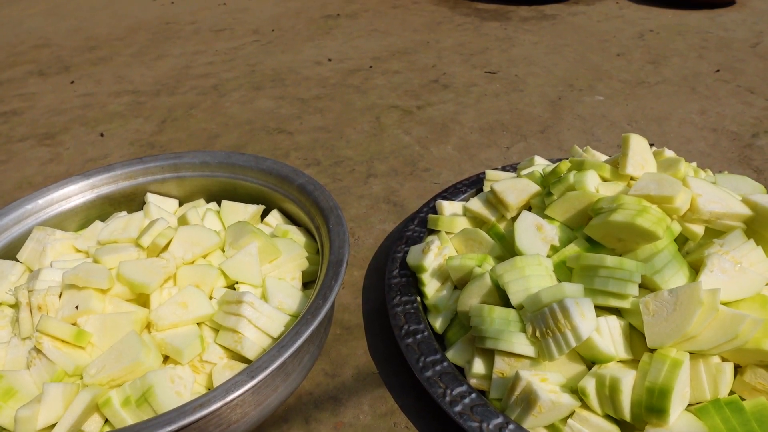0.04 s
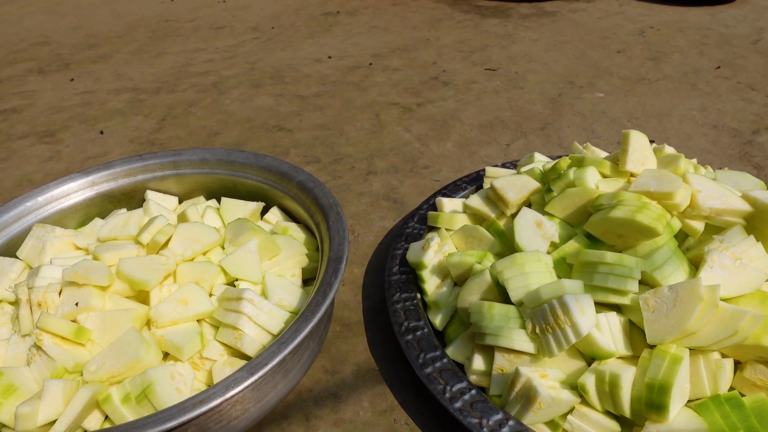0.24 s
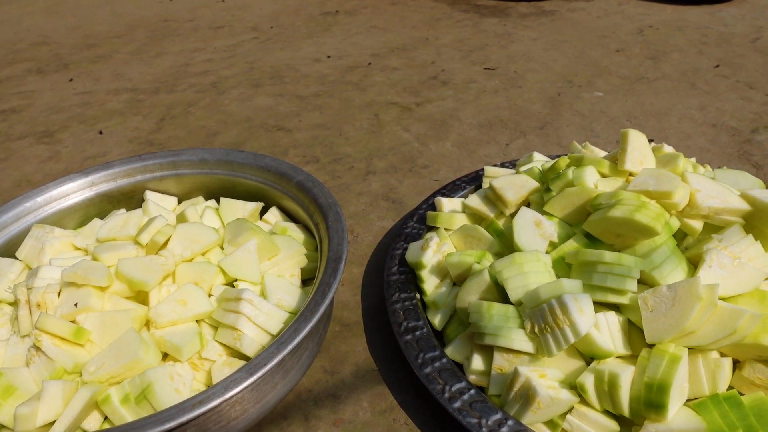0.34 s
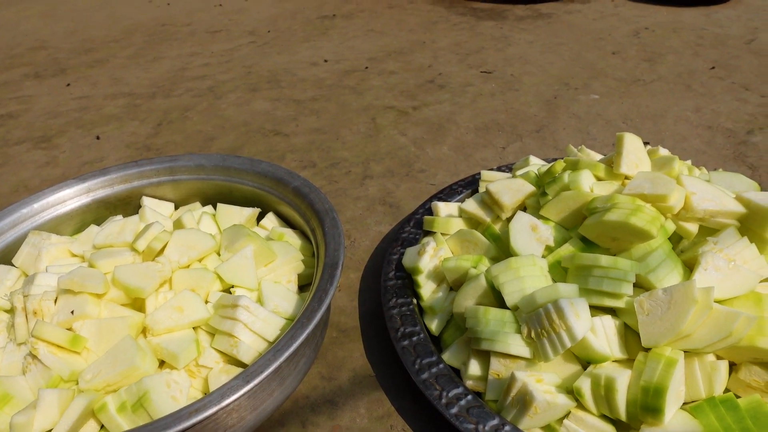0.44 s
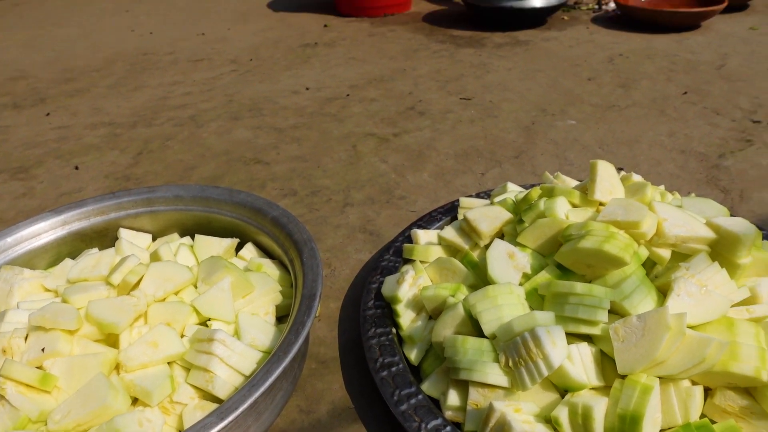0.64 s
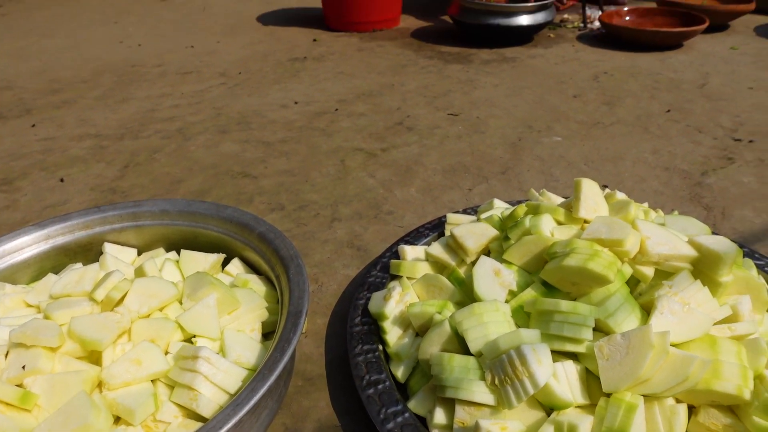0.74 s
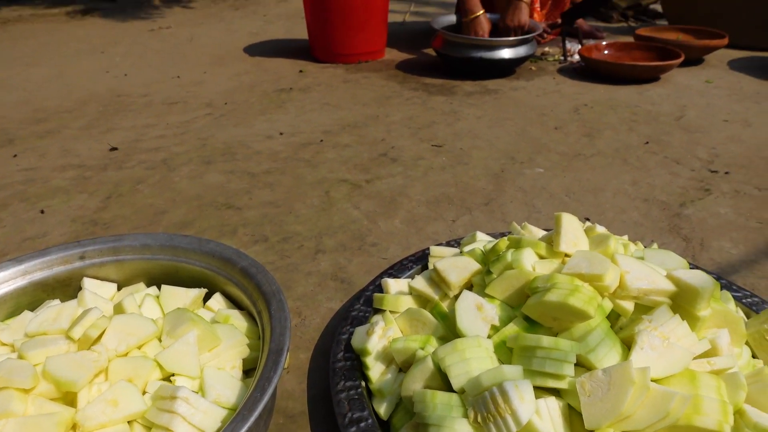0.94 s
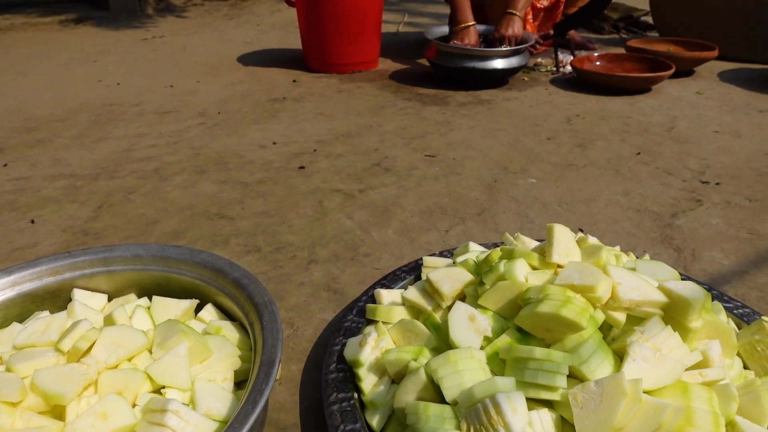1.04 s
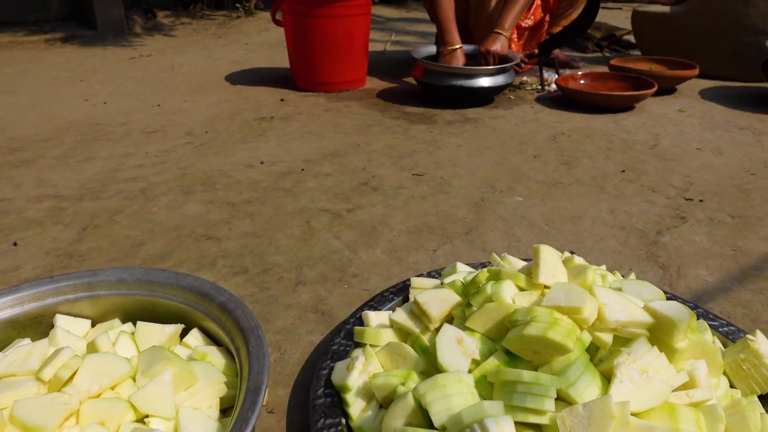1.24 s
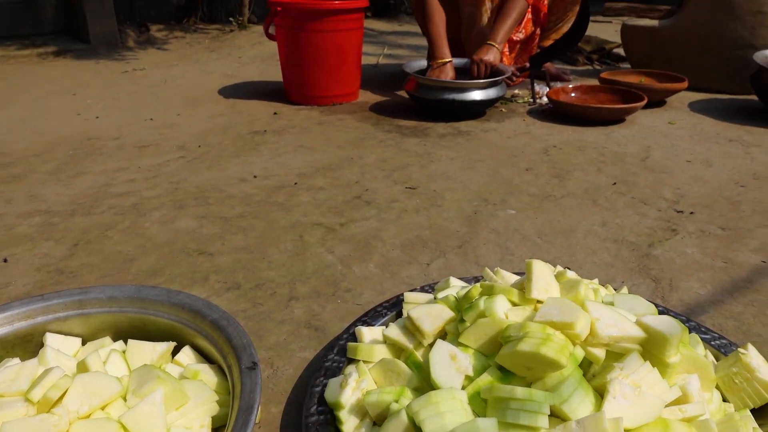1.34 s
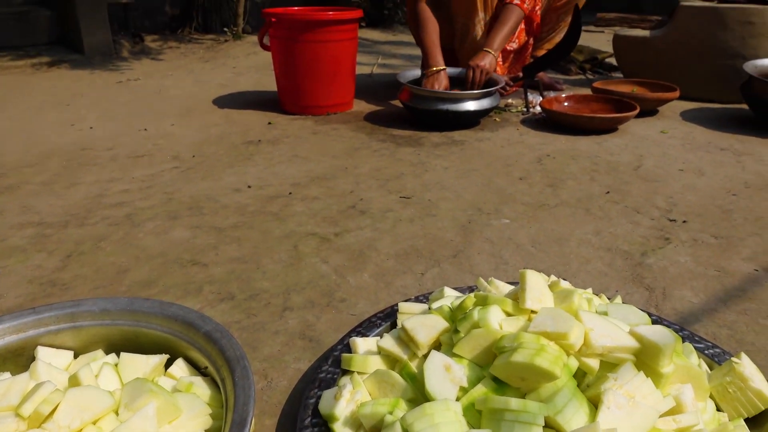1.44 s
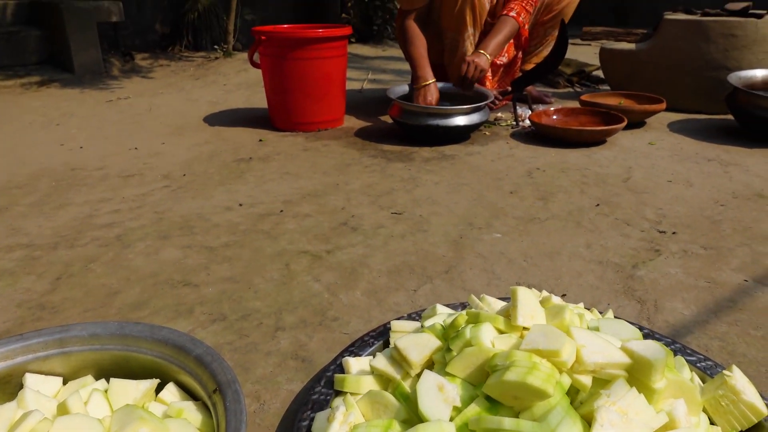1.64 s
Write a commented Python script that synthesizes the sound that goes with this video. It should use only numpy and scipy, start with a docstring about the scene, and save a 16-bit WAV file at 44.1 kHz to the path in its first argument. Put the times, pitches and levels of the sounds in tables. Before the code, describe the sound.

Water splashes as hands wash something in a metal pot, in an open yard outdoors

```python
"""Short slaps and splashes: hands wash something in a metal pot of water, a few metres away in an open yard.
Bursts of grains make the splashes, climbing sines the single clear rings (mostly trapped air bubbles)
and a crowd of resonators the slosh; narrow resonances add the pot. One flung drop ticks on the left
as a set of dying sines.
Behind lie a low outdoor rumble and a soft hiss of coloured noise and, briefly, a faint thin sine tone."""
import sys
import numpy as np
from scipy import signal
from scipy.fft import rfft, irfft
from scipy.io import wavfile
from scipy.ndimage import map_coordinates

SR = 44100
rng = np.random.default_rng(int(sys.argv[2]) if len(sys.argv) > 2 else 0)


def materialize(psi):
    """Save the field psi as 16-bit PCM at rate SR to the path in sys.argv[1].

    A 1-D psi becomes a single channel; in a 2-D psi each row is a channel.
    """
    bounded = np.clip(np.atleast_2d(psi).T, -1, 1)
    quanta = np.round(bounded * 32767).astype(np.int16)
    wavfile.write(sys.argv[1], SR, quanta)


N = 74970
TIME, FREQS = np.arange(N) / SR, np.fft.rfftfreq(N, 1 / SR)
SHORT = TIME[:SR // 8]   # time axis of one brief event, s
GRAINS_PER_S, GRAIN_SPREAD_DB = 20000, 4   # density and unevenness of the water's clicks

# How strongly the stirred water sloshes, before the pot colours it.
# Each row: time in seconds, level in dB.
SLOSH_LEVEL = [(.243, -61), (.25, -36.5), (.306, -37.5), (.333, -34.5), (.365, -43), (.405, -44),
               (.43, -53), (.465, -50), (.51, -58.5), (.558, -48), (.59, -56.5), (.69, -59), (.725, -50),
               (.77, -58.5), (.815, -49), (.88, -56.5), (1.04, -51), (1.12, -42), (1.17, -46), (1.23, -45),
               (1.252, -50.5), (1.275, -43.5), (1.30, -48.5), (1.345, -44.5), (1.40, -54.5), (1.44, -47.5),
               (1.5, -52)]


def from_db(db):
    """Decibels to gain."""
    return 10 ** (np.asarray(db) / 20)


def rms_one(x):
    """Scale to unit rms."""
    return x / np.sqrt(np.mean(x * x))


def dying(t, t60):
    """Exponential decay that falls 60 dB in t60 seconds."""
    return np.exp(-np.log(1000) * t / t60)


def in_time(rows):
    """Draw each column of a table as a curve, sample by sample."""
    s, *columns = np.transpose(rows)
    return [np.interp(TIME, s, c) for c in columns]


def over_hz(points):
    """Read a table on a log-frequency axis."""
    hz, value = np.transpose(points)
    return np.interp(np.log1p(FREQS), np.log(hz), value)


def band(x, low_hz, high_hz, order=2):
    """Butterworth band-pass, its upper edge kept below the top of the range."""
    high = min(high_hz, .47 * SR)
    return signal.sosfilt(signal.butter(order, [low_hz, high], "band", fs=SR, output="sos"), x)


def resonate(x, hz, width_hz):
    """One resonance with unit gain on top."""
    return signal.lfilter(*signal.iirpeak(hz, hz / width_hz, fs=SR), x + 1e-18)


def colour(x, spectrum):
    """Filter a steady sound by a spectrum table; unit rms."""
    return rms_one(irfft(rfft(x) * from_db(over_hz(spectrum)), N))


def grains(count):
    """Dense random clicks of uneven size and either sign: bursting droplets."""
    size_db = GRAIN_SPREAD_DB * np.minimum(rng.exponential(size=count), 4)
    sizes = from_db(size_db) * np.sign(rng.normal(size=count))
    return sizes * (rng.random(count) < GRAINS_PER_S / SR)


def at(s, x):
    """Place a short sound in time."""
    return np.pad(x, (int(s * SR), N))[:N]


def panned(x, db):
    """Place a sound between the ears; positive dB leans left."""
    return from_db([[db / 2], [-db / 2]]) * x


def splash(s, db, hold, hz, body_db, spray_db):
    """A first crack, then a burst of droplets: a main resonance, a lower body and fine spray."""
    t60_s, width = .024, .22   # width as a share of the centre pitch
    crack_db, crack_t60_s = 0, .006   # extra strength of the first contact
    body_hz, spray_hz = (1010, 3100), (5400, 10670)
    mist_db = -21   # finest spray, up to the top of the treble
    fall = dying(np.maximum(SHORT - hold, 0), t60_s)
    shape = fall + from_db(crack_db) * dying(SHORT, crack_t60_s)
    core, body, spray = (shape * grains(len(SHORT)) for part in range(3))
    burst = (rms_one(band(core, hz / (1 + width), hz * (1 + width)))
             + from_db(body_db) * rms_one(band(body, *body_hz, order=3))
             + from_db(spray_db) * rms_one(band(spray, *spray_hz, order=3))
             + from_db(mist_db) * rms_one(band(body, max(spray_hz), SR)))
    fall_rms = np.sqrt(np.mean(fall * fall))
    return at(s, from_db(db) * rms_one(burst) * fall_rms)


def splashes():
    """Hands and falling water strike the surface, one burst for each contact."""
    # Each row: start in seconds, level in dB before the pot, hold in seconds before the fall,
    # centre pitch in Hz, body in dB and spray in dB, both against the main resonance.
    strikes = [(0.2439, -22, .004, 4980, -13, -6.5), (0.258, -29.5, 0.0022, 5150, -8, -11),
               (0.278, -31.5, .003, 5030, -12, -12), (.295, -32, 0.0033, 4370, -16, -15),
               (0.327, -34.5, .006, 4900, -13, -23), (0.4452, -36, .003, 3500, -5.5, -4.5),
               (0.4528, -36.5, 0.0037, 3400, -7, -2.5), (.4748, -36, 0.00092, 4400, -14, -7),
               (.4812, -35, .0003, 10100, -27, -3), (.7926, -33.5, .015, 4400, -8, -7),
               (1.0893, -23.5, .002, 4440, -4, -9.5), (1.0978, -31, .002, 5200, 1, -10),
               (1.1145, -33.5, .006, 4400, 0, -10), (1.2168, -34, 0.0044, 4400, -7, -13),
               (1.668, -44, .01, 3200, -17, -16)]
    return sum(splash(*row) for row in strikes)


def slosh():
    """Stirred water: a crowd of tiny bubbles, each ringing for some cycles."""
    # Colour of the slosh. Each row: frequency in Hz, relative gain in dB.
    slosh_colour = [(450, -18), (1200, -0.5), (2100, -4.5), (2900, 1), (4600, -4), (9000, -13),
                    (15000, -16.5)]
    fizz_width = .08   # resonance width as a share of pitch
    level_db, = in_time(SLOSH_LEVEL)
    clicks = grains(N)
    pitches = np.linspace(700, 15500, num=110)
    dealt = rng.integers(len(pitches), size=N)   # which pitch each click excites
    fizz = sum(resonate(clicks * (dealt == k), hz, hz * fizz_width) / np.sqrt(hz)
               for k, hz in enumerate(pitches))
    return from_db(level_db) * colour(fizz, slosh_colour)


def pot(x):
    """The metal pot adds narrow resonances, which waver as the water moves."""
    # Resonances of the pot. Each row: frequency in Hz, gain in dB.
    modes = [(1270, -3.5), (1725, 0.5), (2635, 1.5), (3100, 2), (3830, 0.5), (4447, 2), (5137, 5.5),
             (5565, 1.5), (7350, 3), (8690, 2.5)]
    width_hz, direct_share = 85, 0.95   # direct: the water's noise heard past the resonances
    waver, waver_hz = .008, 14   # rms share of pitch; fastest waver
    out = direct_share * x
    for hz, db in modes:
        bend = waver * rms_one(band(rng.standard_normal(N), waver_hz / 2, waver_hz))
        read_at = np.cumsum(1 + bend) - 1   # uneven reading speed bends the pitch
        out = out + from_db(db) * map_coordinates(resonate(x, hz, width_hz), [read_at])
    return out


def clear_ring(s, hz, db, t60):
    """A dying sine that climbs slightly, as a trapped bubble does when it nears the surface."""
    rise, attack_s = 0.029, 0.00041   # share of pitch climbed in one t60; swell time
    phase = 2 * np.pi * np.cumsum(hz + hz * rise * SHORT / t60) / SR
    swell = np.expm1(-SHORT / attack_s)   # negative: it only flips the polarity
    return at(s, from_db(db) * swell * dying(SHORT, t60) * np.sin(phase))


def clear_rings():
    """Single clear rings that climb slightly: mostly trapped air bubbles, with a low ring of the pot at 700 Hz."""
    # Each row: start in seconds, starting pitch in Hz, level in dB, t60 in seconds.
    single_rings = [(.2445, 5137, -15, .04), (.2445, 4440, -20, .035), (0.2444, 8670, -25.5, 0.02),
                    (.246, 700, -41, .17), (.286, 4400, -27.5, .07), (.295, 1754, -33, .06),
                    (.312, 1724, -32, 0.094), (.324, 1690, -27, 0.06), (.392, 2560, -37, .05),
                    (.4475, 3280, -31, .025), (0.4505, 2550, -30, .05), (.793, 4230, -32.5, .06),
                    (1.074, 723, -35, 0.074), (1.080, 1610, -31.5, 0.045), (1.090, 2870, -20, .03),
                    (1.090, 4450, -20, .02), (1.090, 5120, -22, .02), (1.092, 1130, -28, .05),
                    (1.118, 2890, -32, 0.023), (1.129, 956, -39, .06), (1.18, 2545, -23, 0.024),
                    (1.185, 930, -39, 0.076), (1.2026, 1180, -26, 0.033), (1.219, 2900, -26.5, .035),
                    (1.272, 1230, -40, .05), (1.321, 1610, -37, 0.045), (1.336, 890, -34.5, 0.105),
                    (1.35, 1450, -37.5, 0.043), (1.453, 3400, -35, 0.035), (1.514, 3050, -39, 0.031),
                    (1.604, 2320, -39, 0.017)]
    return sum(clear_ring(*row) for row in single_rings)


def patter():
    """Droplets fall back into the stirred water, each trapping a small bubble of its own pitch."""
    low_hz, high_hz = 1000, 4000
    against_slosh_db, cycles = -1, 55   # cycles rung within the t60
    s, pitch = rng.random((2, 400))
    s = s * N / SR
    hz = low_hz * (high_hz / low_hz) ** pitch
    db = np.interp(s, *np.transpose(SLOSH_LEVEL)) + against_slosh_db
    return sum(map(clear_ring, s, hz, db, cycles / hz))


def drop():
    """A flung drop strikes something hard, rings a bright tick of dying sines and rebounds once."""
    # Ringing modes of the tick. Each row: frequency in Hz, level in dB.
    modes = [(2950, -31), (4800, -27), (5400, -34), (6200, -30), (9000, -26), (10400, -34), (13450, -23)]
    strike_s, cycles = 1.4236, 100   # cycles rung within the t60
    rebound_s, rebound_db = 1.4405, -14
    tick = 0
    for k, (hz, db) in enumerate(modes):
        ring = dying(SHORT, cycles / hz) * np.sin(2 * np.pi * hz * SHORT)
        tick = tick + from_db(db) * ring * (-1) ** k   # alternate polarity
    return at(strike_s, tick) + from_db(rebound_db) * at(rebound_s, tick)


def scatter(x, t60, dull_hz):
    """Dying diffuse reflections, different at each ear: filtered noise as an echo pattern."""
    tail = band(rng.standard_normal((2, N)), 350, dull_hz, order=1) * dying(TIME, t60)
    return signal.fftconvolve(x, rms_one(tail) / np.sqrt(N), axes=1)[:, :N]


def background(spectrum):
    """Steady outdoor noise, nearly alike at both ears in the bass."""
    # Left-right likeness. Each row: frequency in Hz, likeness from 0 to 1.
    likeness = [(165, .985), (290, .7), (3000, 0.69), (15000, 0.67)]
    alike = np.minimum(over_hz(likeness), 1)
    mid, side = rfft(rng.standard_normal((2, N))) * np.sqrt([1 + alike, 1 - alike])
    return colour(irfft([mid + side, mid - side], N), spectrum)


def rumble():
    """Low outdoor rumble: noise weighted to the bass."""
    # Each row: frequency in Hz, relative gain in dB.
    rumble_colour = [(30, -48), (40, -24), (65, -9.5), (115, 2), (155, -4.5), (210, -2), (420, -17.5),
                     (900, -21.5), (4000, -50)]
    return from_db(-53) * background(rumble_colour)


def hiss():
    """Soft broad noise that slowly grows."""
    # Each row: frequency in Hz, relative gain in dB.
    hiss_colour = [(700, -1.5), (3000, -2.5), (8000, -3.5), (16000, -14)]
    start_db, rise_db_per_s = -52.5, 1.4
    return from_db(start_db + rise_db_per_s * TIME) * background(hiss_colour)


def thin_tone():
    """A faint, far sine tone, slowly sinking in pitch."""
    # Each row: time in seconds, pitch in Hz, level in dB.
    tone_path = [(.51, 1485, -60), (.68, 1454, -55), (.80, 1450, -66.5), (1.02, 1428, -56.5)]
    hz, db = in_time(tone_path)
    start, *_, end = (s for s, *_ in tone_path)
    sounding = (TIME > start) * (TIME < end)
    return from_db(db) * np.sin(2 * np.pi * np.cumsum(hz) / SR) * sounding


def scene():
    """The water in its pot, the yard's reflections and the background."""
    water = pot(splashes() + slosh()) + clear_rings() + patter()
    near_field = panned(water, -1.4) + panned(drop(), 9)
    # scatter off the pot's wall and the ground
    near_field = near_field + from_db(-20.5) * scatter(near_field, t60=.02, dull_hz=13900)
    yard = from_db(-13.5) * scatter(near_field, t60=0.31, dull_hz=7040)
    return near_field + yard + rumble() + hiss() + thin_tone()


def record(dry):
    """The top of the treble is cut steeply by an elliptic low-pass."""
    cutoff_hz = 15800
    return signal.sosfilt(signal.ellip(10, .2, 80, cutoff_hz, fs=SR, output="sos"), dry)


dry = scene()
out = record(dry)
materialize(out)
```